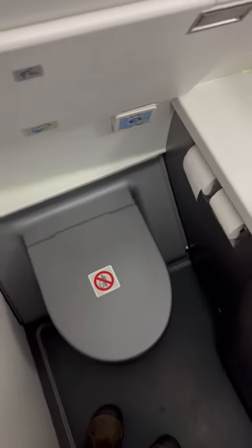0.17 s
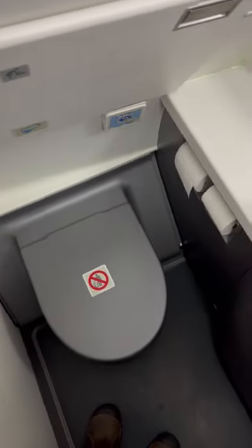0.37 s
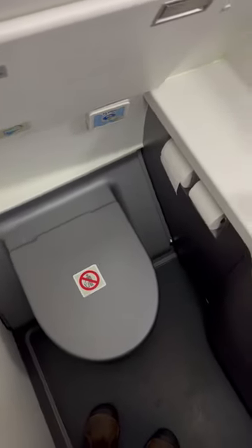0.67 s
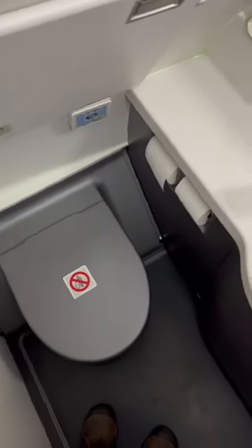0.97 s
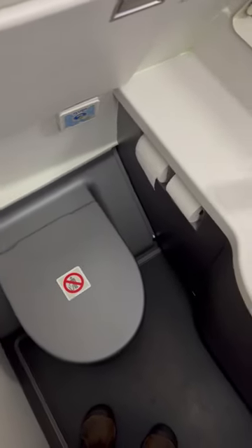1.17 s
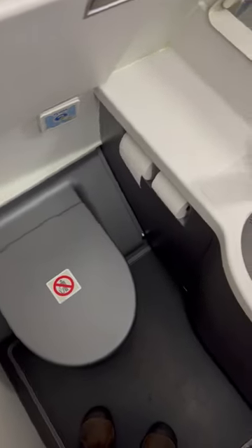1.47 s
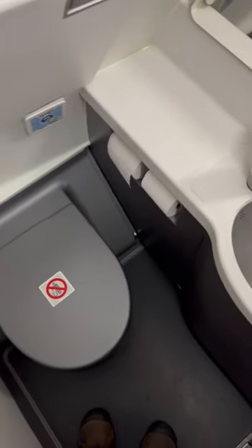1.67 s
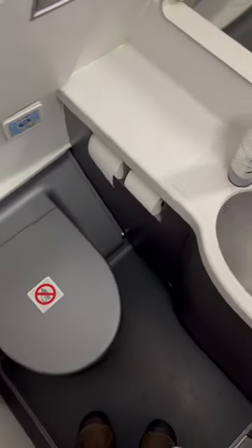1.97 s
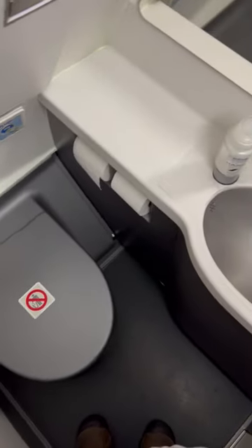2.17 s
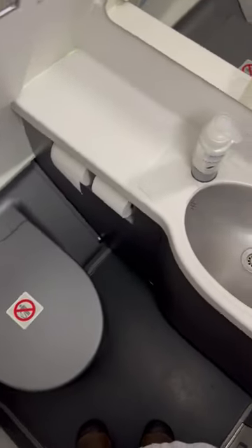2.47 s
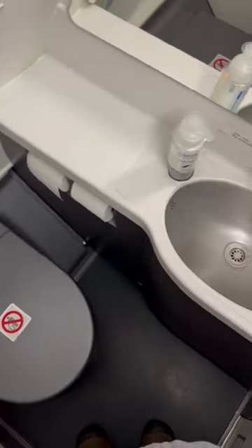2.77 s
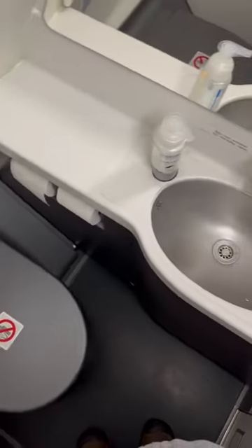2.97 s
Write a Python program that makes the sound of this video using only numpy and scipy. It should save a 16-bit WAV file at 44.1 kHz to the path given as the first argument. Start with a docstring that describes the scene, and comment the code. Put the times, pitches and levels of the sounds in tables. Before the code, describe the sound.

Deep engine hum of a plane with steady rushing vent air inside a small restroom

```python
"""The deep hum of the engines fills a small airplane restroom, over the rumble of the hull.
The hum is a nearly pure tone whose level is uneven where it beats with the rumble's low noise.
Air rushes through the vent as coloured noise, with faint duct tones and thin fan whines as narrow noise.
Most duct tones fade during the opening. Later the rush turns wide and hollow for about half a second,
and its treble stays wider afterwards."""
import sys
import numpy as np
from scipy import signal
from scipy.fft import rfft, irfft, next_fast_len
from scipy.io import wavfile
from scipy.ndimage import uniform_filter1d, map_coordinates

SR = 44100
rng = np.random.default_rng(int(sys.argv[2]) if len(sys.argv) > 2 else 0)


def persist_wave(psi):
    """Save psi, clipped to +-1, as 16-bit WAV."""
    counts = np.round(np.clip(psi, -1, 1) * 32767).astype(np.int16)
    wavfile.write(sys.argv[1], SR, np.atleast_2d(counts).T)


N = 137151  # length in samples


def amp(db):
    """Turn decibels into gain."""
    return 10 ** (np.asarray(db) / 20)


def unit(x):
    """Scale to an average strength (rms) of 1."""
    return x / np.sqrt(np.mean(x ** 2) + 1e-20)


def along(points, hz):
    """Read a curve of (f/Hz, value) points, joined by straight lines on a log frequency axis."""
    f, value = np.transpose(points)
    return np.interp(np.log(hz + 1), np.log(f + 1), value)


def over_time(points, seconds):
    """Read a curve of (t/s, value) points, joined by straight lines."""
    return np.interp(seconds, *np.transpose(points))


def wobble(rate):
    """Draw a smooth random curve through `rate` random points a second."""
    points = rng.standard_normal(int(N * rate / SR) + 4)
    return map_coordinates(points, [np.arange(N) * rate / SR])


def noise(response):
    """Make noise of rms 1, coloured by a gain that depends on frequency."""
    m = next_fast_len(N + SR // 2)
    spectrum = rfft(rng.standard_normal(m))
    colour = response(np.fft.rfftfreq(m, 1 / SR))
    return unit(irfft(spectrum * colour, m)[:N])


def narrow(centre, width):
    """Make a narrow band of noise that is heard as a tone; its gain halves `width` Hz from the centre."""
    return noise(lambda hz: 1 / (1 + ((hz - centre) / width) ** 2))


def frames(x, size=2048):
    """Cut sound into short-time spectra: frequencies as a column, times in seconds, spectra."""
    hz, s, z = signal.stft(x, SR, nperseg=size)
    return hz[:, None], s, z


def samples(z, size=2048):
    """Turn short-time spectra back into sound."""
    return signal.istft(z, SR, nperseg=size)[1][..., :N]


def panned(x, balance_db):
    """Make left and right, the left louder by balance_db."""
    return np.array([x * amp(balance_db / 2), x * amp(-balance_db / 2)])


def stereo(middle, sides, balance_db):
    """Make left and right from a panned middle, adding the sides left and subtracting them right."""
    return panned(middle, balance_db) + np.array([sides, -sides])


# Thin fan whines: f/Hz, width/Hz, level/dB
FAN_WHINES = [(5822, 17, -73.5), (9523, 4, -86), (9679, 4, -87.5)]


def fans():
    """Thin, steady whines, each a very narrow band of noise."""
    return sum(amp(db) * narrow(hz, width) for hz, width, db in FAN_WHINES)


# Colour of the hull's rumble: f/Hz, level/dB (per Hz, relative)
RUMBLE_COLOUR = [(15, -36), (28, -13.5), (50, -10.5), (66, -2), (80, 2.5), (100, 0.5), (135, -5.5),
                 (160, -17.5), (220, -17), (400, -57.5), (900, -130)]
RUMBLE_DB = -21.5
RUMBLE_SIDE_DB = -24.5  # sides relative to the middle


def hull():
    """Air turbulence on the hull booms in the cubicle, almost alike at both ears."""
    colour = lambda hz: amp(along(RUMBLE_COLOUR, hz))
    middle = noise(colour)
    sides = amp(RUMBLE_SIDE_DB) * noise(colour)
    return amp(RUMBLE_DB) * stereo(middle, sides, balance_db=-0.6)


def opening(seconds):
    """Share of the opening sound: 1 at first, falling evenly to 0."""
    fade_s = 1.3
    return np.clip(1 - seconds / fade_s, 0, 1)


# Narrow resonances of the ducts, before the airflow's filters:
# f/Hz, width/Hz, level/dB at the start, level/dB after the opening, left over right/dB at the start
DUCT_RESONANCES = [(468, 18, -43.5, -43.5, 2.5), (713, 8.8, -50.5, -54.5, -5), (1528, 8.5, -55.5, -54.5, 4),
                   (1644, 39, -47, -50.5, 0), (2925, 15, -52, -71, 11), (3190, 22, -60, -70.5, -3),
                   (3720, 25, -64, -73.5, 0), (3920, 12, -73, -74, -3)]


def ducts():
    """Middle and sides of the duct resonances, which change level and move to the centre early on."""
    early = opening(np.arange(N) / SR)
    both_ears = 0
    for hz, width, start_db, later_db, pan_db in DUCT_RESONANCES:
        level_db = later_db + early * (start_db - later_db)
        both_ears = both_ears + panned(amp(level_db) * narrow(hz, width), early * pan_db)
    left, right = both_ears
    return (left + right) / 2, (left - right) / 2


# Colour of the rushing air: f/Hz, level/dB (per Hz, relative)
AIR_COLOUR = [(90, -37), (170, -3), (280, -0.4), (450, -3), (510, -9), (660, -8.5), (770, -13.5),
              (960, -10.5), (1400, -14.5), (1900, -17), (2700, -19.5), (3700, -25.5), (4300, -31.5),
              (5100, -39), (6400, -35.5), (8600, -41), (10200, -51), (11700, -54)]
AIR_DB = -30  # before the filters below


def rush():
    """Turbulent air in the vent, as broad coloured noise."""
    return amp(AIR_DB) * noise(lambda hz: amp(along(AIR_COLOUR, hz)))


# Depth of the hollow swing: t/s, depth (0 is none, 1 is the full curves below, more overshoots them)
SWING_DEPTH = [(1.79, 0), (1.86, 0.9), (1.97, 1.4), (2.05, 0.66), (2.12, 1.07), (2.28, 1.35), (2.37, 1.08),
               (2.41, 0)]


def air_changes(seconds):
    """Depth of the brief hollow swing, and a switch from 0 to 1 for the lasting change."""
    swing = over_time(SWING_DEPTH, seconds)
    widened = np.where(seconds > 1.82, 1.0, 0.0)
    return swing, widened


# Change of the middle during the swing: f/Hz, level/dB
SWING_MIDDLE_CURVE = [(200, -1.5), (470, -1.5), (535, -8), (615, -6.5), (715, -17), (850, -2.5), (1150, -2),
                      (1500, 0)]
# Lasting change of the middle: f/Hz, level/dB
WIDEN_MIDDLE_CURVE = [(200, -1.2), (400, -1.5), (650, 0.5), (1100, -0.7), (2800, -1), (5000, -0.4)]
# Extra colour of the middle at the start, which fades with the opening: f/Hz, level/dB
OPENING_COLOUR = [(400, -2), (700, 3.5), (1200, -2.5), (2300, .3), (3200, 0.5), (5000, -0.5)]


def air_middle(direct, hz, seconds):
    """The middle of the rush: its colour shifts early, then is hollowed out by the swing."""
    swing, widened = air_changes(seconds)
    gain_db = swing * along(SWING_MIDDLE_CURVE, hz)
    gain_db = gain_db + widened * along(WIDEN_MIDDLE_CURVE, hz)
    gain_db = gain_db + opening(seconds) * along(OPENING_COLOUR, hz)
    return direct * amp(gain_db)


# Usual width: f/Hz, level/dB of sides over middle
AIR_WIDTH = [(150, -15.5), (280, -37), (450, -13.5), (760, -0.5), (1000, -3.5), (1800, -13.5),
             (2400, -11.5), (3000, -3), (4000, -6.5), (5000, 2), (6300, -23), (8500, -5.5), (11000, 8)]
# Change of the sides during the swing: f/Hz, level/dB
SWING_SIDES_CURVE = [(150, 20.5), (450, 11), (720, 4), (930, 7), (1400, 4.5), (2200, 0), (4000, -0.5)]
# Lasting change of the sides: f/Hz, level/dB
WIDEN_SIDES_CURVE = [(300, -1), (1000, 1), (1800, 5), (2500, 7), (3100, 1.5), (5000, -1.5)]
# Usual lead of the right ear: f/Hz, share of the sides (negative makes the left ear lead)
RIGHT_LEAD = [(500, 0), (850, -.35), (1400, 0), (3000, .1), (4600, .6), (5600, 0)]
# Lead added during the swing: f/Hz, share of the sides
SWING_RIGHT_LEAD = [(150, 0.69), (400, .7), (700, -0.28), (1300, -0.4), (2500, 0)]


def air_sides(direct, diffuse, hz, seconds):
    """The sides of the rush: independent noise plus a phase-shifted share that makes one ear lead."""
    swing, widened = air_changes(seconds)
    lead = np.clip(along(RIGHT_LEAD, hz) + swing * along(SWING_RIGHT_LEAD, hz), -1, 1)
    width_db = along(AIR_WIDTH, hz) + swing * along(SWING_SIDES_CURVE, hz)
    width_db = width_db + widened * along(WIDEN_SIDES_CURVE, hz)
    # -1j turns the phase of this share by a quarter: later on the left, earlier on the right
    return (np.sqrt(1 - lead ** 2) * diffuse - 1j * lead * direct) * amp(width_db)


# Usual balance of the middle: f/Hz, level/dB of left over right
AIR_BALANCE = [(150, 1), (300, -1.5), (600, -3), (940, 2), (1500, .2), (2400, 1.1), (7000, .3)]
# Balance shift during the swing: f/Hz, level/dB towards the left
SWING_BALANCE_CURVE = [(150, 0.5), (350, -4.5), (700, -7), (1800, -0.5), (2200, 2), (2700, 0)]
# Lasting balance shift: f/Hz, level/dB towards the left
WIDEN_BALANCE_CURVE = [(500, 0), (950, -4), (2000, -2.5), (3000, -1), (6000, -.5)]


def air_balance(hz, seconds):
    """Left-right balance of the middle of the rush, in dB."""
    swing, widened = air_changes(seconds)
    shift_db = swing * along(SWING_BALANCE_CURVE, hz) + widened * along(WIDEN_BALANCE_CURVE, hz)
    return along(AIR_BALANCE, hz) + shift_db


def airflow():
    """A broad, slightly patchy rush with duct tones, changing in colour, width and balance."""
    patchy_db, swell_db = 1.72, 0.28  # typical size of the random changes
    tones, tone_sides = ducts()
    hz, seconds, spectra = frames(np.array([rush() + tones, rush(), tone_sides]))
    direct, diffuse, tone_sides = spectra
    middle = air_middle(direct, hz, seconds)
    sides = air_sides(direct, diffuse, hz, seconds) + tone_sides
    # patches: random levels smoothed across frequency, then time
    patches = uniform_filter1d(rng.standard_normal(direct.shape), size=5, axis=0)
    patches = unit(uniform_filter1d(patches, size=22, axis=1))
    both_ears = stereo(middle, sides, air_balance(hz, seconds)) * amp(patchy_db * patches)
    return amp(swell_db * wobble(2.3)) * samples(both_ears)


# Moments when hum and low noise cancel by chance: t/s, level/dB at the deepest point
CANCELLATIONS = [(0.11, -19), (0.305, -13), (0.418, -9), (0.827, -10), (2.02, -12.5), (2.435, -8)]


def cancellations():
    """Brief chance cancellations of hum and low noise, as bell-shaped gain dips."""
    t = np.arange(N) / SR
    half_length_s = 0.011
    return amp(sum(db * np.exp(-((t - s) / half_length_s) ** 2) for s, db in CANCELLATIONS))


def engine_tone(hz):
    """A nearly pure tone of rms 1 whose pitch drifts slightly."""
    drift_hz = 0.076
    turns = np.cumsum(hz + drift_hz * wobble(2.5)) / SR
    return np.sqrt(2) * np.sin(2 * np.pi * (turns + rng.random()))


# Level of hum and low noise beating together, before the cancellations: t/s, level/dB
BEATING_LEVEL = [(0.0, -15), (0.2, -17), (0.46, -15.5), (0.54, -17.5), (0.63, -15), (0.71, -16),
                 (0.81, -19), (0.87, -12), (1.08, -15), (1.16, -13), (1.22, -17.5), (1.61, -15),
                 (1.76, -15.5), (2.09, -12), (2.19, -15.5), (2.39, -13), (2.46, -18.5), (2.52, -10.5),
                 (2.72, -16.5), (2.84, -12), (2.93, -19.5), (3.05, -12), (3.11, -18.5)]
# Weaker engine tone, before the cancellations: f/Hz, level/dB
WEAK_ENGINE_TONES = [(124, -43)]


def engines():
    """One strong hum, its level uneven from chance beating with low noise, and a weaker tone above it."""
    t = np.arange(N) / SR
    hum = amp(over_time(BEATING_LEVEL, t)) * engine_tone(77.15)
    return hum + sum(amp(db) * engine_tone(hz) for hz, db in WEAK_ENGINE_TONES)


def scene():
    """Fans, hull, airflow and engines together; the chance cancellations also thin the rumble a little."""
    cancel_gain = cancellations()
    rumble_share = 0.26  # share of each cancellation, in dB
    hum = panned(cancel_gain * engines(), balance_db=0.08)
    return fans() + cancel_gain ** rumble_share * hull() + airflow() + hum


def record(dry):
    """Cut the treble steeply above a band limit."""
    top_hz = 11700
    low_pass = signal.butter(16, top_hz, fs=SR, output="sos")
    return signal.sosfiltfilt(low_pass, dry)


dry = scene()
out = record(dry)
persist_wave(out)
```